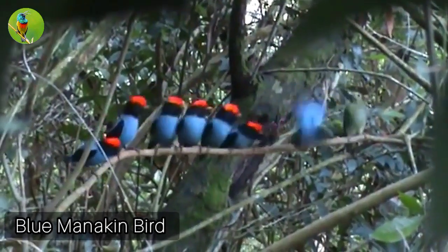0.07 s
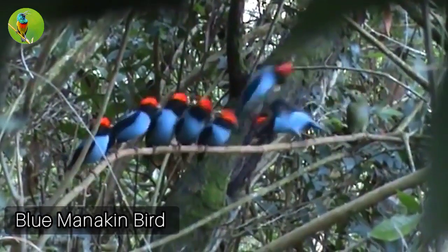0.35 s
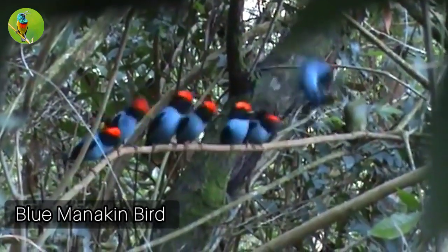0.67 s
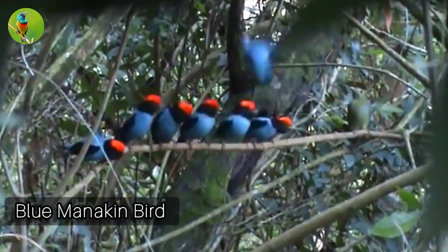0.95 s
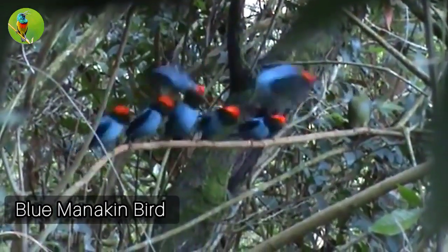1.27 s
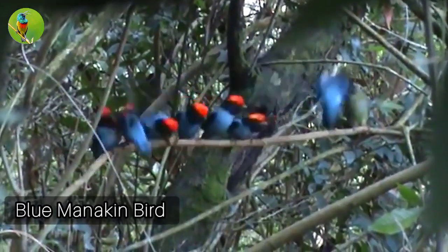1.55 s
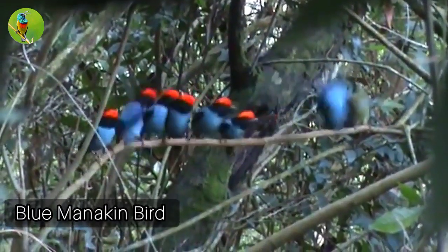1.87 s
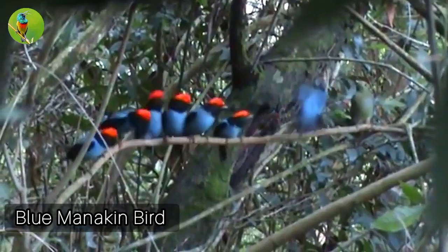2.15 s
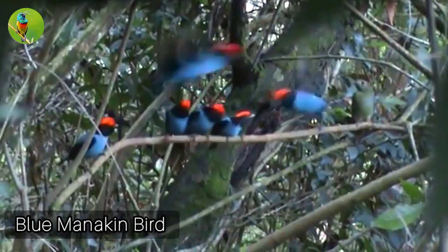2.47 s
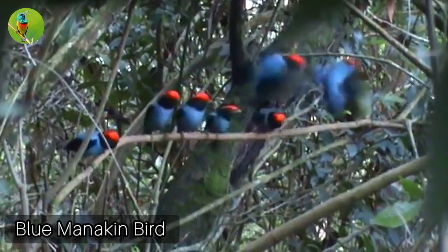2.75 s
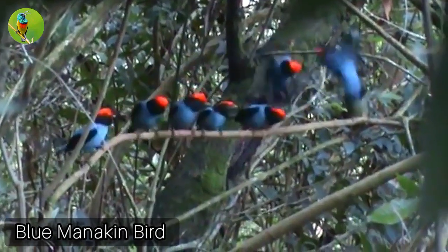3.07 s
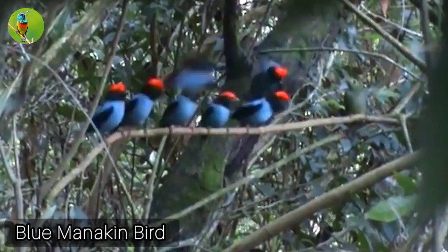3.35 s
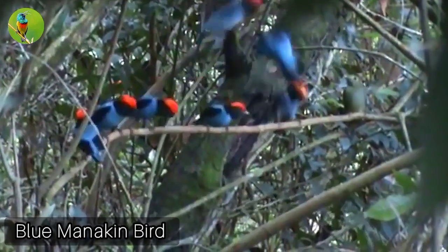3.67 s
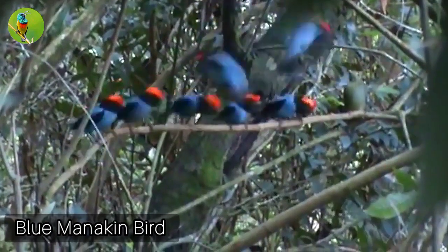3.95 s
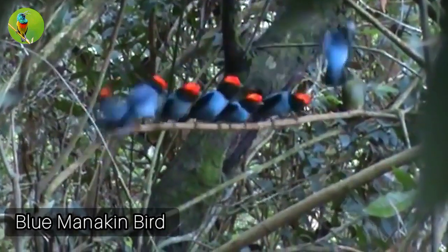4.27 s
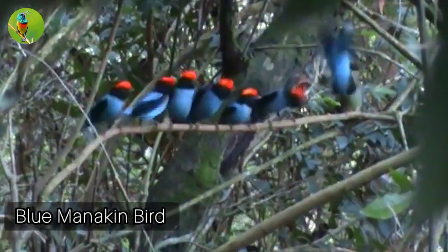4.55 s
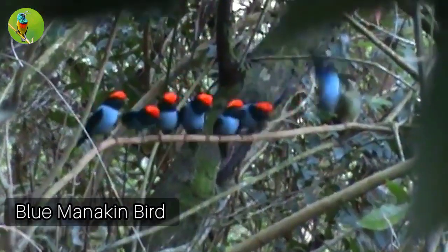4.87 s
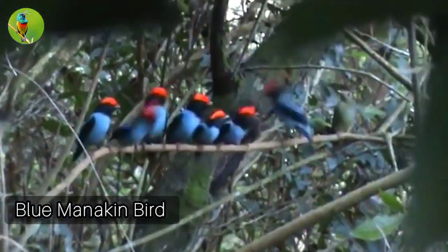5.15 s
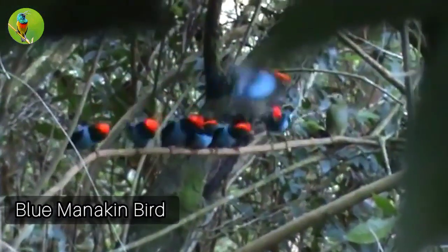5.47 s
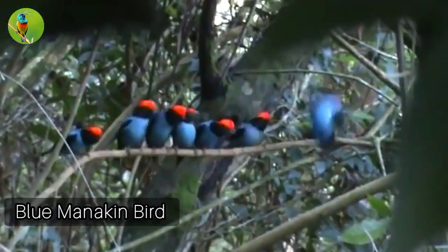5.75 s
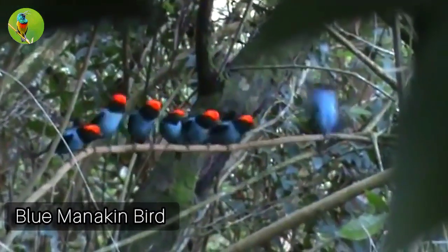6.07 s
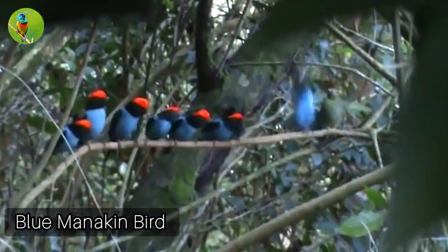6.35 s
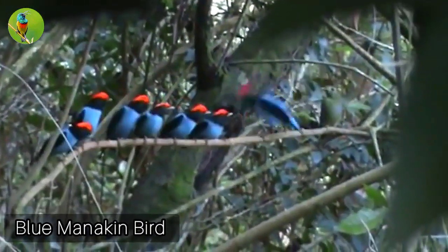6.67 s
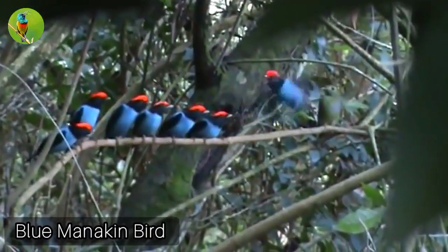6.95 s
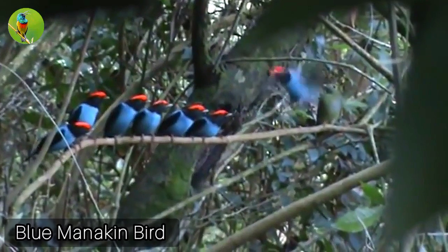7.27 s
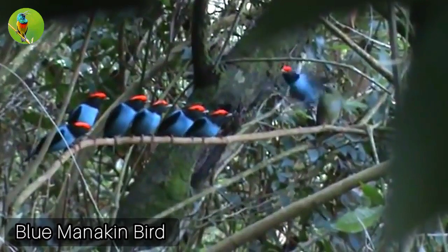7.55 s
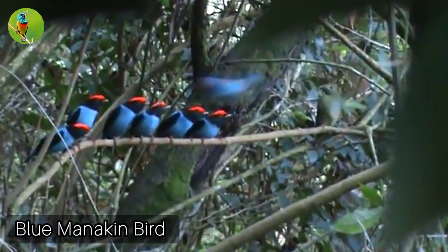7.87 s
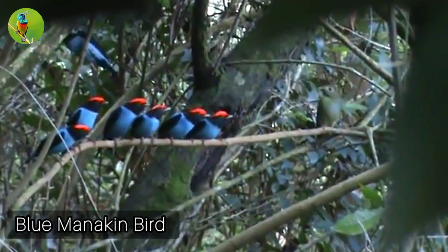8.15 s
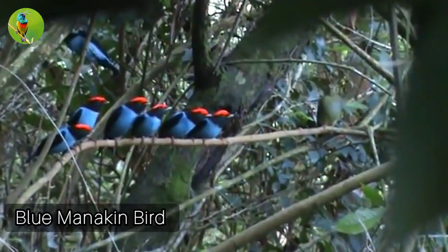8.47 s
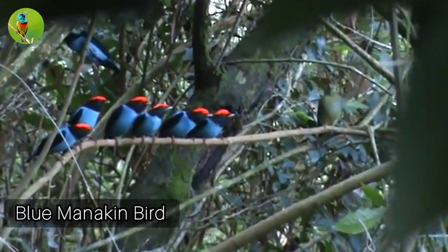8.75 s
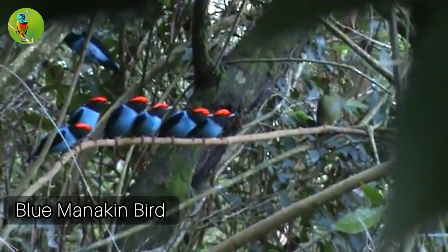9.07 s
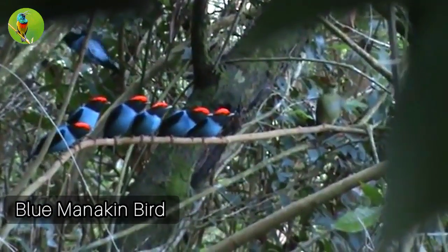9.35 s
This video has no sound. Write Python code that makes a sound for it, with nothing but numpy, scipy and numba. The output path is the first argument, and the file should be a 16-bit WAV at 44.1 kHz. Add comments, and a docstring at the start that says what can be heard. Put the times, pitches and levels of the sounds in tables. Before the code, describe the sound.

Buzzy nasal bird calls and thin squeaks overlap above whirring wings, then one bird gives nine loud, sharp notes in quiet woodland.

```python
"""Dense forest, a stereo microphone near a branch where male blue manakins dance in a row. From the start,
over quiet forest air, nasal rasps alternate with thin squeaks in quick bouts; around and between the bouts
several birds snarl and mew over whirring wings. A faint hum comes in after three seconds. Just past seven
the lead male, in flight, ends the dance with nine sharp, loud keks, and then a far bird whistles.
Each voice is a pulse train or a tone from the syrinx, coloured by the throat; trunks echo every note."""
import sys
import numpy as np
from scipy import signal
from scipy.fft import rfft, irfft, next_fast_len
from scipy.io import wavfile
from numba import njit

SR = 44100
rng = np.random.default_rng(int(sys.argv[2]) if len(sys.argv) > 2 else 0)


def digitize_waveform(pressure):
    """Quantize a signal to 16-bit integers and store it at the path in sys.argv[1].

    Rows of a 2-D input are taken as channels; values are limited to [-1, 1].
    """
    field = np.atleast_2d(pressure).T
    bounded = np.clip(field, -1, 1)
    quanta = np.round(bounded * 32767).astype(np.int16)
    wavfile.write(sys.argv[1], SR, quanta)


N = 414540
TIME = np.arange(N) / SR


def undb(db):
    """Decibels to gain."""
    return 10 ** (np.asarray(db) / 20)


def unit(x):
    """Scale to rms 1."""
    return x / np.sqrt(np.mean(x ** 2) + 1e-18)


def shaped(x, spectrum):
    """A sound filtered by a curve of (Hz, dB) points, rms 1."""
    size = next_fast_len(len(x))
    hz, db = np.transpose(spectrum)
    bin_hz = np.fft.rfftfreq(size, 1 / SR)
    gain = undb(np.interp(np.log(bin_hz + 1), np.log(hz), db))
    return unit(irfft(rfft(x, size) * gain, size)[:len(x)])


def coloured(spectrum, size=N):
    """Noise with the given spectrum, rms 1."""
    return shaped(rng.standard_normal(size), spectrum)


def wander(t, rate):
    """Random levels, rate a second, joined by straight lines; spread near 1."""
    knots = np.random.default_rng(rng.integers(2 ** 31)).standard_normal(int(t[-1] * rate) + 2)
    return np.sqrt(3 / 2) * np.interp(t * rate, np.arange(len(knots)), knots)


def note(length, attack, release):
    """Time axis and flat-topped envelope of one note; the release follows its length."""
    t = np.arange(int((length + release) * SR)) / SR
    return t, np.clip(t / attack, 0, 1) * np.clip((length + release - t) / release, 0, 1)


def swell(length):
    """Time axis and rounded envelope of one note."""
    t = np.arange(int(length * SR)) / SR
    return t, np.sin(np.pi * t / length)


def add(track, start, sound):
    """Mix a sound into the track, start in seconds."""
    i = max(int(start * SR), 0)
    track[..., i:i + sound.shape[-1]] += sound[..., :N - i]


@njit
def svf(x, hz, width):
    """State-variable band-pass with a moving centre."""
    y, band_state, low_state = np.empty(len(x)), 0., 0.
    for i in range(len(x)):
        g, damping = np.tan(np.pi * hz[i] / SR), width / hz[i]
        band = (band_state + g * (x[i] - low_state)) / (1 + g * (g + damping))
        band_state = 2 * band - band_state
        low_state += 2 * g * band
        y[i] = damping * band
    return y


def bandpass(x, hz, width):
    """Band-pass around a steady or moving centre, width in Hz."""
    return svf(x, hz * np.ones(len(x)), float(width))


def resonance(x, hz, width):
    """A steep resonance: the band-pass applied twice, rms 1."""
    return unit(bandpass(bandpass(x, hz, width), hz, width))


# The air deep among the trees. Each row: frequency in Hz, relative level in dB.
FOREST_SPECTRUM = [(20, -16), (40, -4.5), (100, -11.5), (200, -14.5), (300, -12), (700, -15.5),
                   (1500, -20.5), (2300, -17.5), (6000, -28), (10000, -33), (15500, -39.5)]


def forest_air(level_db=-53, side_db=-2.9, apart_hz=165):
    """Quiet distant rustle all around the microphone; the bass is the same left and right."""
    highpass = signal.butter(3, apart_hz, "high", fs=SR, output="sos")
    side = undb(side_db) * signal.sosfilt(highpass, coloured(FOREST_SPECTRUM))
    return undb(level_db) * (coloured(FOREST_SPECTRUM) + side * np.array([[1], [-1]]))


# The hum's rise and fall in the background. Each row: time in seconds, level in dB.
HUM_LEVELS = [(2.6, -103), (3.7, -61), (4.6, -57), (6.2, -57), (9.4, -61.5)]


def hum(pitch_hz=116.3):
    """A faint, slightly wavering hum, strongest an octave over its fundamental."""
    db = np.interp(TIME, *np.transpose(HUM_LEVELS))
    phase = 2 * np.pi * np.cumsum(pitch_hz * (1 + 0.00482 * wander(TIME, 7.2))) / SR
    tone = sum(undb(level_db) * np.sin(k * phase) for k, level_db in [(1, -9), (2, 0), (3, -17), (6, -14)])
    return undb(db + wander(TIME, 11)) * unit(tone)


def trees(x, early_db, tail_db, early_side=0.54, tail_side=0.19, treble_side=0,
          t60=0.61, early_s=.042, trunks=16, leaf_hz=4850, leaf_width=800, leaf_db=-8):
    """Direct sound, echoes from near trunks, then a dull diffuse tail with one treble band lifted."""
    t = np.arange(SR) / SR
    early = np.zeros((2, SR))
    delay = rng.uniform(0.03, 1, trunks)  # as a share of early_s
    for row in early:
        np.add.at(row, (delay * early_s * SR).astype(int), rng.choice([-1, 1], trunks) * np.exp(-delay))
    early = undb(early_db) * early / np.linalg.norm(early[0])
    tail = rng.standard_normal((2, SR)) * undb(-60 * t / t60) * np.clip(t / 0.0018, 0, 1)
    tail = signal.sosfilt(signal.butter(1, 6500, fs=SR, output="sos"), tail)
    tail += undb(leaf_db) * np.array([bandpass(row, leaf_hz, leaf_width) for row in tail])
    tail = undb(tail_db) * tail / np.linalg.norm(tail[0])
    mid = (t == 0) + early[0] + tail[0]
    side = early_side * early[1] + tail_side * tail[1]
    # short waves differ most between the two microphone capsules
    side += treble_side * signal.sosfiltfilt(signal.butter(2, 7500, "high", fs=SR, output="sos"), side)
    left_right = [signal.fftconvolve(x, mid + sign * side)[:len(x)] for sign in (1, -1)]
    return np.array(left_right) / np.linalg.norm(mid)


def whistle(hz, spectrum, hoarse_db, harmonics=6):
    """A tone and the hoarse turbulence it stirs, both coloured by the throat."""
    phase = 2 * np.pi * np.cumsum(hz) / SR
    tone = shaped(sum(np.sin(k * phase) for k in range(1, harmonics + 1)), spectrum)
    turbulence = unit(np.gradient(coloured(spectrum, size=len(hz))))
    return unit(tone + undb(hoarse_db) * turbulence)


def glides(table, spectrum, jitter, hoarse_db):
    """Short whistled notes that fade as they glide."""
    out = np.zeros(N)
    for start, length, db, start_hz, end_hz in table:
        t, envelope = note(length, attack=0.0016, release=0.0035)
        envelope = unit(envelope * undb(-6 * t / length))
        hz = np.interp(t, [0, length], [start_hz, end_hz]) * (1 + jitter * wander(t, 787))
        add(out, start, undb(db) * envelope * whistle(hz, spectrum, hoarse_db))
    return out


# A bird far off in the forest.
# Each row: start and length in seconds, level in dB, first and last pitch in Hz.
FAR_WHISTLES = [(8.35, 0.012, -54, 2610, 2570), (8.395, 0.056, -75.5, 2560, 2480),
                (8.55, 0.04, -61, 2520, 2500)]


def far_bird():
    """Three faint, almost pure whistles, each falling a little."""
    return glides(FAR_WHISTLES, [(2600, 0), (5000, -30)], jitter=.005, hoarse_db=-40)


# Air in the dancers' feathers. Each row: frequency in Hz, relative level in dB.
WING_SPECTRUM = [(400, -15), (620, -0.5), (1000, -3), (2000, -6), (5000, -8), (8000, -16), (10000, -17),
                 (15000, -26)]


def wings(effort_db, beat_hz=26, depth_db=3, gain_db=-14, excitement=0.78):
    """Air rushes through the feathers on each beat; the birds flutter hardest while they snarl."""
    beat = np.sin(2 * np.pi * np.cumsum(beat_hz * (1 + 0.1475 * wander(TIME, 6))) / SR)
    db = effort_db.max() + excitement * (effort_db - effort_db.max())
    return undb(db + gain_db + depth_db * beat) * coloured(WING_SPECTRUM)


def syrinx(hz):
    """One sharp pulse a cycle, shared between two samples."""
    phase = np.cumsum(hz / SR)
    i = np.flatnonzero(np.diff(np.floor(phase)))
    late = (phase[i + 1] % 1) * SR / hz[i + 1]
    pulses = np.zeros(len(hz))
    pulses[i], pulses[i + 1] = late, 1 - late
    return pulses


def buzz(t, pitch_hz, sag, jitter, scatter=0.0231, roughening_per_s=0.273, shimmer_db=4.5):
    """The pulses of one note: they sag in pitch and grow rougher."""
    roughness = (jitter + roughening_per_s * t) * wander(t, 198.3)
    hz = pitch_hz * (1 + scatter * rng.standard_normal() - sag * (t / t[-1]) ** 2 + roughness)
    return syrinx(hz) * undb(shimmer_db * np.tanh(wander(t, 304)))


def throat(pulses, middle_hz, upper_hz, upper_db, middle_width, low_db, upper_width=600, edge_db=-24):
    """Three resonances and a thin bright edge; the upper one takes over as the beak opens (upper_db)."""
    low = undb(low_db) * resonance(pulses, hz=1540, width=600)
    lower_pair = unit(low - resonance(pulses, middle_hz, middle_width))
    upper = undb(upper_db) * resonance(pulses, upper_hz, upper_width)
    edge = undb(edge_db) * resonance(pulses, hz=4540, width=3800)
    return (lower_pair + upper) / np.sqrt(1 + undb(upper_db) ** 2) + edge


# The row of birds snarling together on the branch.
# Each row: start, swell time and length in seconds, relative peak level in dB.
GROUP_SNARLS = [(0, 0.0033, 0.51, -42.5), (0.633, 0.1, 0.33, -35), (0.924, 0.038, 0.51, -40),
                (1.428, 0.04, 0.18, -36.5), (1.617, 0.091, 1, -42), (2.7, 0.11, 1, -33.5),
                (3.585, 0.19, 0.83, -34.5), (4.458, 0.075, 1, -39.5), (5.558, 0.031, 0.39, -35.5),
                (6.024, 0.081, 1, -41.5), (7.024, 0.056, 0.12, -42.5)]


def snarl_effort(swell_db=8, sag_db_per_s=6.5, release_db_per_s=227, beak_opens_s=0.091):
    """Level (dB) and beak opening (0-1) of the loudest snarl: it swells, sags slowly and is let go."""
    db, opening = np.full(N, -100.), np.zeros(N)
    for start, swell_s, length, peak_db in GROUP_SNARLS:
        t = TIME - start
        outside_s = np.maximum(-t, 0) + np.maximum(t - length, 0)
        level = peak_db - swell_db * np.clip(1 - t / swell_s, 0, 1) ** 2
        level -= sag_db_per_s * np.maximum(t - swell_s, 0) + release_db_per_s * outside_s
        opening = np.where(level > db, np.clip(t / beak_opens_s, 0, 1), opening)
        db = np.maximum(db, level)
    return db, opening


def snarl(effort_db, opening, pitch_hz=310, jitter=.04, throb_hz=10.5, throb_db=6, stagger=0.22,
          fall=0.2, middle_hz=2170, closed_hz=3150, open_hz=3520, closed_db=-7, gain_db=-3):
    """Three rough voices throb in turn; opening beaks raise and strengthen the upper resonance."""
    upper_hz = closed_hz + (open_hz - closed_hz) * opening
    upper_db = closed_db * (1 - opening)
    throbs = np.cumsum(throb_hz * (1 + 0.207 * wander(TIME, 4))) / SR
    voices = np.zeros(N)
    for bird in range(3):
        phase = (throbs + bird * stagger) % 1
        hz = pitch_hz * np.exp(.1 * wander(TIME, 9) + jitter * wander(TIME, 300))
        pulses = syrinx(hz) * undb(-throb_db * np.cos(2 * np.pi * phase) + 3 * np.tanh(wander(TIME, 300)))
        # each throat keeps changing shape, and its colour falls through every throb
        stretch = 1 + 0.083 * wander(TIME, 25) - fall * (phase - .5)
        voices += throat(pulses, middle_hz * stretch, upper_hz * stretch, upper_db,
                         middle_width=330, low_db=-4, edge_db=-11.5)
    return undb(effort_db + gain_db) * unit(voices)


# Chips from the branch. Each row: start and length in seconds, level in dB, first and last pitch in Hz.
CHIP_NOTES = [(0.876, 0.023, -37, 1880, 1960), (1.447, 0.017, -47, 2190, 2040),
              (2.828, 0.032, -32, 2176, 2540), (4.489, 0.038, -32, 2424, 2450),
              (4.783, 0.026, -30, 2260, 2384)]
# The throat in a chip. Each row: frequency in Hz, gain in dB.
CHIP_SPECTRUM = [(700, -36), (2400, -5), (3400, -1), (4700, 2.5), (6000, -10), (9600, -22), (15000, -23)]


def chips():
    """Single thin, hoarse chips thrown in over the chorus."""
    return glides(CHIP_NOTES, CHIP_SPECTRUM, jitter=.045, hoarse_db=-6)


# Nasal mews from the branch.
# Each row: start and length in seconds, relative level in dB, first and last upper resonance in Hz.
MEW_NOTES = [(0.729, 0.17, -35, 3650, 2830), (0.997, 0.036, -36, 3600, 3350),
             (1.433, 0.071, -38.5, 4100, 3650), (1.554, 0.058, -39, 3770, 3480),
             (2.832, 0.046, -33, 4500, 3700), (2.898, 0.051, -34, 3930, 3300),
             (2.955, 0.037, -34.5, 4100, 3800), (3.007, 0.043, -32, 3960, 3380),
             (3.068, 0.072, -35, 4000, 3340), (3.171, 0.054, -33, 3530, 3330),
             (3.241, 0.05, -36.5, 3640, 3500), (3.384, 0.051, -37, 3680, 3680),
             (3.445, 0.057, -33.5, 3530, 3640), (3.629, 0.047, -37.5, 3620, 3500),
             (3.779, 0.043, -37.5, 3680, 3420), (3.856, 0.086, -38, 3535, 3840),
             (3.988, 0.0344, -35, 3480, 3200), (4.055, 0.07, -37.5, 3450, 3770),
             (4.133, 0.11, -37.5, 4000, 3670), (4.215, 0.039, -40.5, 3400, 3260),
             (4.305, 0.042, -36.5, 3680, 3320), (5.68, 0.091, -34.5, 3360, 3420),
             (5.794, 0.044, -37, 3880, 3600), (5.856, 0.038, -35, 3750, 3450)]


def mews(gain_db=-1, overhang_s=0.0109):
    """One bird at a time swells out of the snarl, beak wide open, its resonance mostly sliding down."""
    out = np.zeros(N)
    for start, length, db, start_hz, end_hz in MEW_NOTES:
        t, envelope = swell(length + overhang_s)
        upper_hz = np.interp(t, [0, length], [start_hz, end_hz])
        pulses = buzz(t, pitch_hz=330.5, sag=0.0958, jitter=0.0276, scatter=.04)
        voice = throat(pulses, 0.628 * upper_hz, upper_hz, upper_db=8,
                       middle_width=400, low_db=-3, upper_width=900)
        add(out, start, undb(db + gain_db) * unit(envelope * voice))
    return out


# Slurs outside the rhythm, mostly closing a bout. Each row: start and length in seconds, relative level
# in dB, upper resonance over the lower ones in dB, middle resonance, first and last upper resonance in Hz.
SLUR_NOTES = [(0.423, 0.091, -30.5, 9.5, 2240, 2970, 3770), (2.507, 0.074, -29, 10, 2280, 3240, 3580),
              (5.43, 0.043, -32, 7.5, 2390, 3230, 3740), (6.844, 0.095, -32.5, 6.5, 2420, 3080, 3660),
              (6.999, 0.016, -39, 17, 2380, 3080, 3840), (7.115, 0.054, -42.5, 13, 2400, 3020, 4050)]


def slurs(gain_db=-1, beak_db_per_s=90):
    """Drawn-out rasps whose narrow upper resonance slides up as the beak opens."""
    out = np.zeros(N)
    for start, length, db, upper_db, middle_hz, start_hz, end_hz in SLUR_NOTES:
        t, envelope = note(length, attack=0.026, release=0.009)
        pulses = buzz(t, pitch_hz=333.5, sag=0.0424, jitter=0.0085)
        upper_hz = np.interp(t, [0, length], [start_hz, end_hz])
        beak_db = upper_db + beak_db_per_s * (t - length / 2)
        voice = throat(pulses, middle_hz, upper_hz, beak_db, middle_width=560, low_db=-5, upper_width=620)
        add(out, start, undb(db + gain_db) * unit(envelope * voice))
    return out


# Bouts of rasp-and-squeak syllables on the branch. Each row: first squeak in seconds, syllable count,
# settled period in seconds, how much shorter the first period is in seconds.
DANCE_BOUTS = [(0.061, 4, .106, .003), (0.874, 7, .092, -.007), (1.665, 9, .105, .022), (3.251, 2, .134, 0),
               (3.617, 7, .0855, 0), (4.453, 11, .097, .012), (5.997, 9, .1074, .029)]
# The caller of each bout. Each row: rasp length in seconds, pitch in Hz, relative level in dB, upper
# resonance over the lower ones in dB, middle and upper resonance in Hz; then the squeak's relative
# level in dB and throat tuning in Hz.
CALLER_VOICES = [(0.038, 313, -38.5, 5, 2260, 3330, -34, 5200),
                 (0.037, 321, -35.5, -8.5, 2174, 3180, -40.5, 5350),
                 (.048, 329, -32, 9.5, 2110, 3410, -34, 5380),
                 (0.056, 335, -32.5, 6, 2100, 3540, -34, 5420),
                 (0.04, 330, -40, 21, 1944, 3760, -38.5, 5400),
                 (.042, 330, -38.5, -4, 2270, 3260, -35.5, 5690),
                 (0.038, 343, -34, -8.5, 2445, 3640, -34.5, 5250)]


def syllables(settle_count=3, rasp_warmup_db=-4.5, squeak_warmup_db=-2.5):
    """Time, rasp and squeak of each syllable. A caller starts soft and often hurried, then settles."""
    for (start, count, period, hurry), voice in zip(DANCE_BOUTS, CALLER_VOICES):
        length, pitch_hz, rasp_db, upper_db, middle_hz, upper_hz, squeak_db, tuning_hz = voice
        for k in range(count):
            fresh = max(1 - k / settle_count, 0)
            rasp = (length, pitch_hz, rasp_db + rasp_warmup_db * (k == 0), upper_db, middle_hz, upper_hz)
            squeak = (squeak_db + squeak_warmup_db * fresh, tuning_hz)
            yield start, rasp, squeak
            start += period - hurry * fresh


def rasps(lead_s=.066, climb_per_s=2.04, arch=0.49, crest=0.62, beak_db_per_s=230,
          gain_db=-0.5, scatter_db=0.74, overhang_s=0.0057):
    """A buzz before each squeak: the opening beak shifts it from the middle to the upper resonance."""
    out = np.zeros(N)
    for squeak_s, (length, pitch_hz, db, upper_db, middle_hz, upper_hz), _ in syllables():
        t, envelope = swell(length + overhang_s)
        pulses = buzz(t, pitch_hz, sag=.06, jitter=.009)
        climbing_hz = middle_hz * (1 + climb_per_s * (t - length / 2) + 0.031 * rng.standard_normal())
        arching_hz = upper_hz * (1 - arch * (t / length - crest) ** 2)
        beak_db = upper_db + beak_db_per_s * (t - length / 2)
        voice = throat(pulses, climbing_hz, arching_hz, beak_db,
                       middle_width=396, low_db=1.2 * upper_db - 14, upper_width=630)
        level_db = db + gain_db + scatter_db * rng.standard_normal()
        add(out, squeak_s - lead_s, undb(level_db) * unit(envelope * voice))
    return out


# The throat in a squeak, when tuned to throat_hz. Each row: frequency in Hz, gain in dB.
SQUEAK_SPECTRUM = [(700, -12), (1450, 6), (2200, -12.5), (3200, 2.5), (4200, -7.5), (5200, 5), (6400, 6.5),
                   (7500, -7.5), (8600, -22), (15000, -34)]


def squeaks(start_hz=1230, end_hz=1720, rise_s=.018, length_s=0.023, jitter=0.028, throat_hz=5650,
            gain_db=-1, scatter_db=1.17):
    """A quick hoarse upward sweep, loudest around its fourth harmonic; no two are quite alike."""
    out = np.zeros(N)
    for start, _, (db, tuning_hz) in syllables():
        t, envelope = note(length_s * np.exp(.2 * rng.standard_normal()), attack=.005, release=.022)
        hz = np.interp(t, [0, rise_s], [start_hz, end_hz])
        hz *= 1 + 0.033 * rng.standard_normal() + jitter * wander(t, 1475)
        stretch = tuning_hz / throat_hz * (1 + 0.015 * rng.standard_normal())
        spectrum = [(f * stretch, gain + 2 * rng.standard_normal()) for f, gain in SQUEAK_SPECTRUM]
        voice = whistle(hz, spectrum, hoarse_db=1)
        level_db = db + gain_db + scatter_db * rng.standard_normal() + 2 * wander(t, 402)
        add(out, start - .002, undb(level_db) * envelope * voice)
    return out


# Pitches that the trunks around the lead male reinforce. Each row: frequency in Hz, relative gain in dB.
RINGING_PEAKS = [(3967, 5), (4048, 1), (4377, 0), (4452, 3), (4657, -7), (4883, -21), (4969, -14),
                 (5136, -22), (5286, -8)]


def ringing(x, width_hz=28, gain_db=-3):
    """Echoes that arrive in step make a few pitches ring briefly."""
    return sum(undb(db + gain_db) * bandpass(x, hz, width_hz) for hz, db in RINGING_PEAKS)


# The lead male's closing keks, loudest at the microphone; the first two rows run into one kek.
# Each row: start and length in seconds, relative level in dB, first and last pitch of the slide in Hz.
KEK_NOTES = [(7.2005, 0.017, -20.5, 4090, 3520), (7.2196, 0.011, -15.5, 4400, 4850),
             (7.3024, 0.052, -19, 4380, 4574), (7.4196, 0.056, -19.5, 4220, 4890),
             (7.534, 0.051, -19, 4333, 4805), (7.646, 0.037, -18, 4120, 4940),
             (7.76, 0.041, -18.5, 4130, 4810), (7.875, 0.022, -16, 4265, 4780),
             (7.989, 0.032, -18, 4297, 4670), (8.104, 0.015, -15.5, 4377, 4770)]
# His throat in a kek. Each row: frequency in Hz, gain in dB.
KEK_SPECTRUM = [(2400, -14), (3400, 0.5), (4400, 11), (5300, 11), (6700, -13), (8400, -3.5), (10500, -4),
                (11300, -8), (13000, -12), (15500, -30)]


def keks(slide_s=0.01346, warble_hz=85, warble_depth=0.085, jitter=0.0703,
         fade_db=10.5, flutter_db=3, gain_db=-1):
    """Each kek snaps down in pitch, slides to its main note and warbles harshly as it fades."""
    out = np.zeros((2, N))
    for start, length, db, start_hz, end_hz in KEK_NOTES:
        t, envelope = note(length, attack=.0015, release=.005)
        snap = 0.148 * np.exp(-t / 0.0019)
        warble = warble_depth * np.cos(2 * np.pi * warble_hz * t)
        hz = np.interp(t, [0, slide_s], [start_hz, end_hz]) * (1 + snap + warble + jitter * wander(t, 1901))
        accent = 1 + 0.49 * np.exp(-t / 0.008)
        envelope *= accent * undb(-fade_db * t / length + flutter_db * wander(t, 600))
        voice = whistle(hz, KEK_SPECTRUM, hoarse_db=-12, harmonics=3)
        kek = np.pad(undb(db + gain_db) * unit(envelope) * voice, (0, SR))
        # he is in flight, so the trunks echo each kek differently
        echoed = trees(kek, early_db=-0.5, tail_db=-3.5, early_side=0.49, tail_side=0.25,
                       treble_side=0.94, leaf_hz=4870, leaf_width=1100, leaf_db=-21)
        add(out, start, echoed + ringing(kek))
    return out


def scene():
    """At the microphone: the dancers on their branch, the lead male in the air, the forest all round."""
    effort_db, opening = snarl_effort()
    dancers = rasps() + slurs() + squeaks() + mews() + snarl(effort_db, opening) + chips()
    birds = trees(dancers + far_bird(), early_db=-6.5, tail_db=-9.5)
    flutter = trees(wings(effort_db), early_db=-1.5, tail_db=-9.5,
                    early_side=0.57, tail_side=1.0, treble_side=-1.8)
    return birds + keks() + flutter + forest_air() + hum()


def record(dry, top_hz=15500):
    """The camera behind the microphone cuts the top treble steeply."""
    return signal.sosfilt(signal.ellip(8, .2, 70, top_hz, fs=SR, output="sos"), dry)


dry = scene()
out = record(dry)
digitize_waveform(out)
```